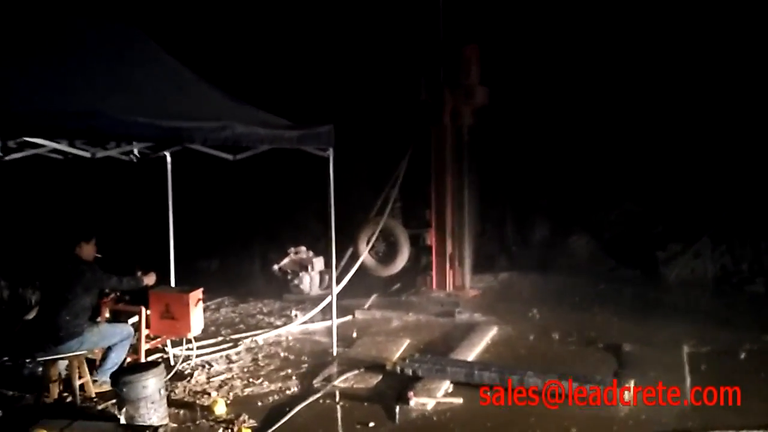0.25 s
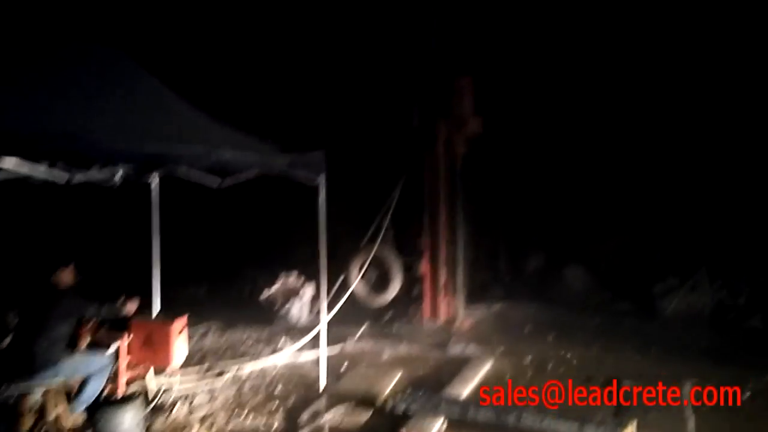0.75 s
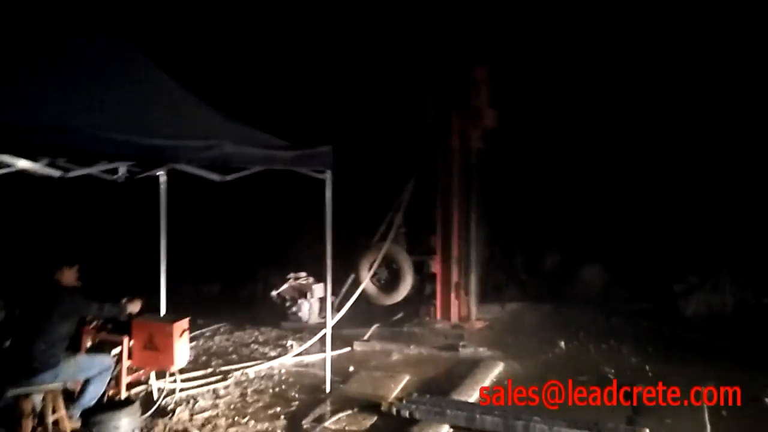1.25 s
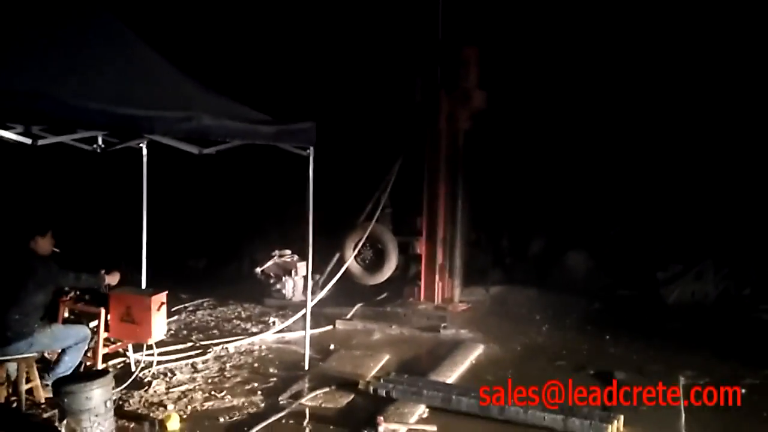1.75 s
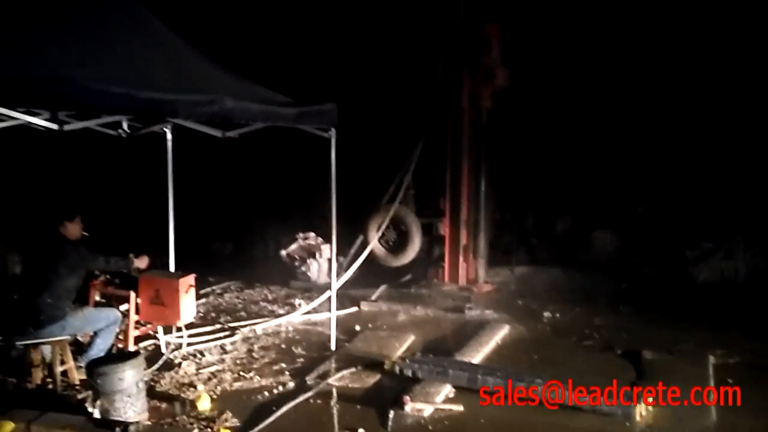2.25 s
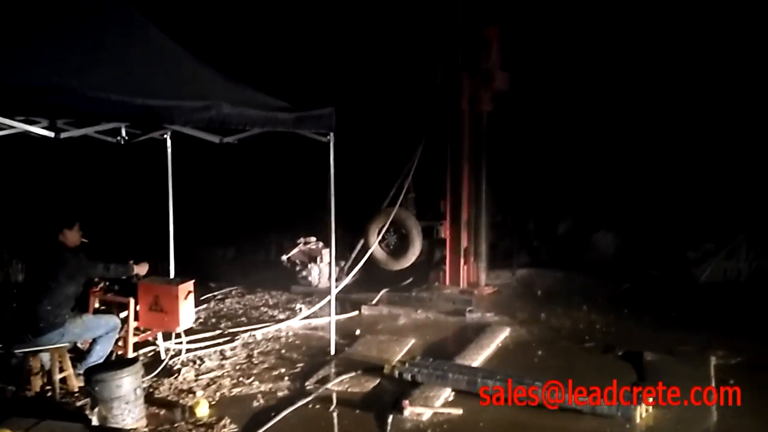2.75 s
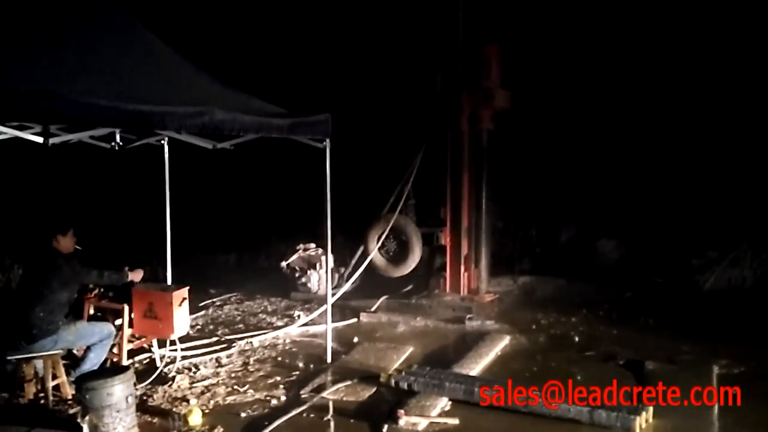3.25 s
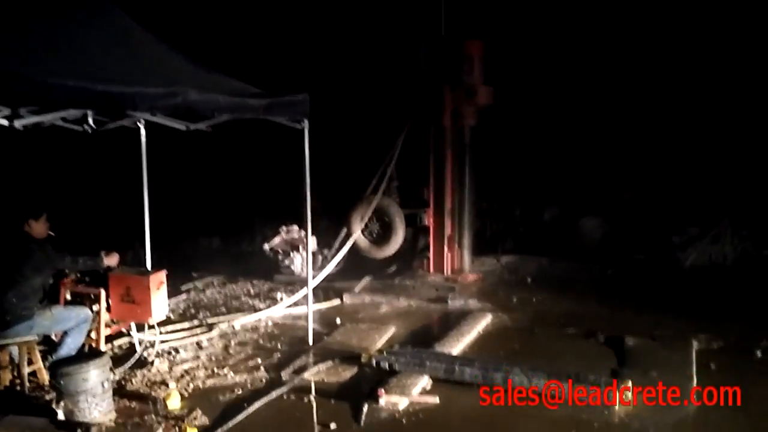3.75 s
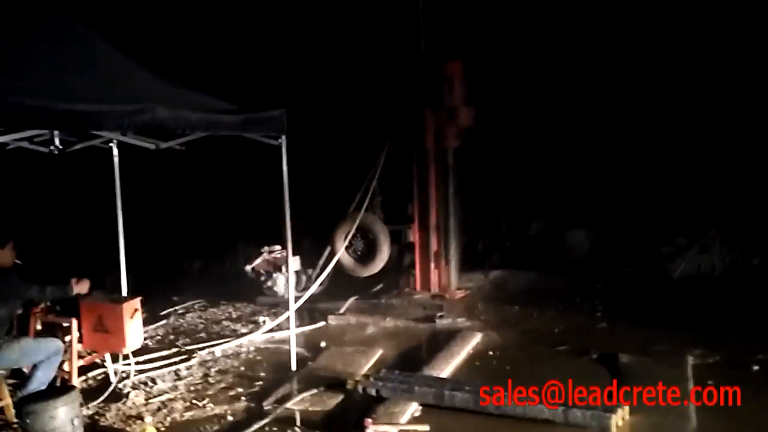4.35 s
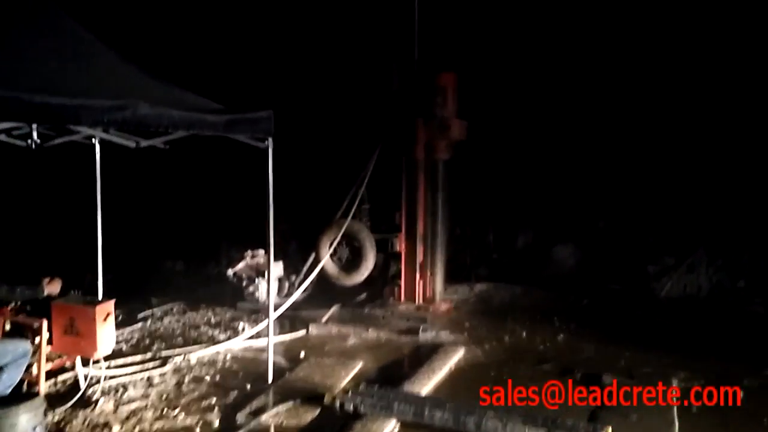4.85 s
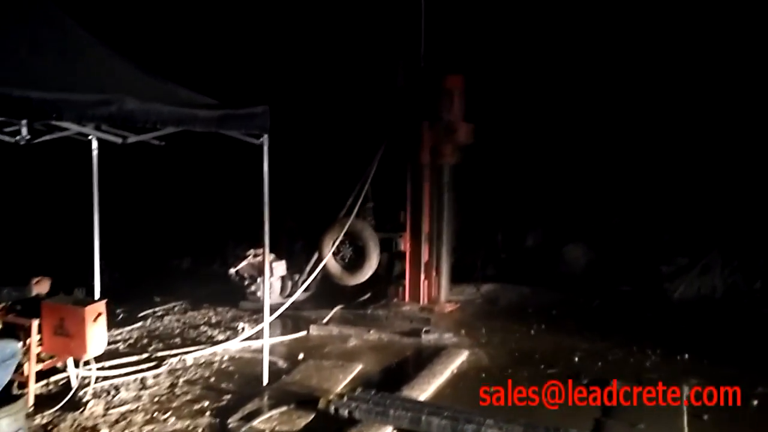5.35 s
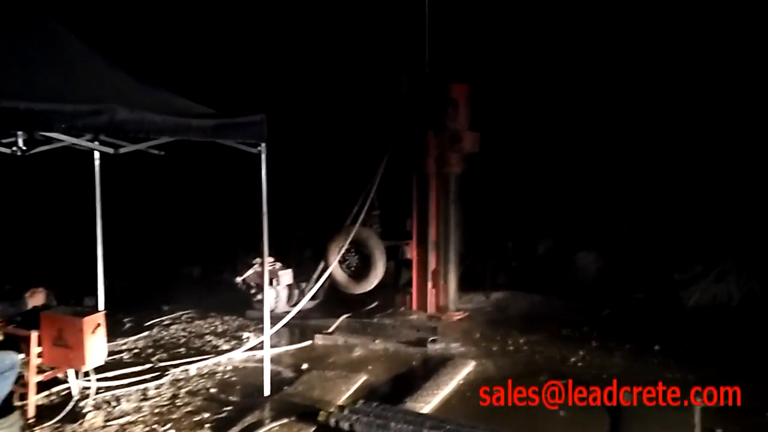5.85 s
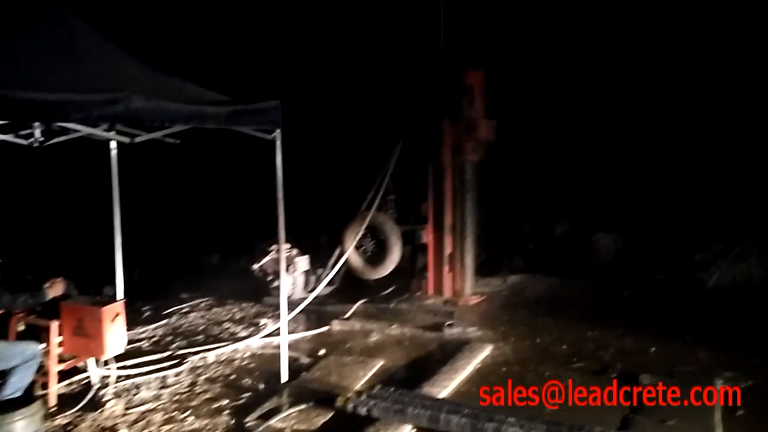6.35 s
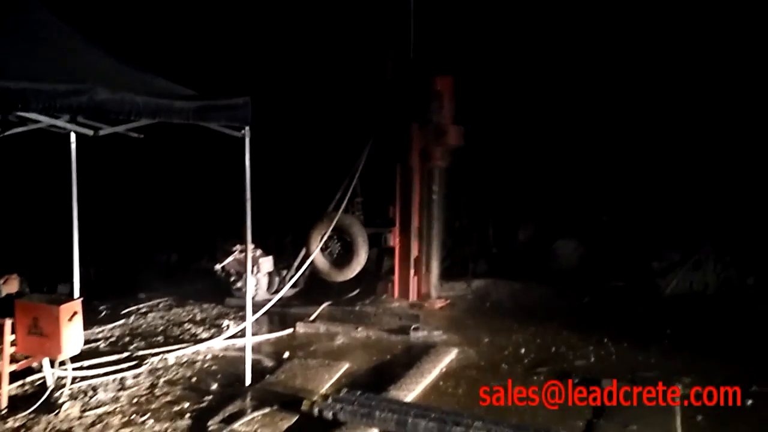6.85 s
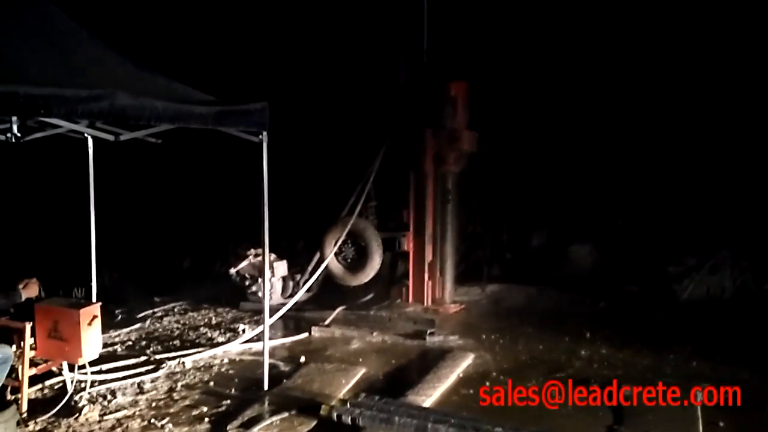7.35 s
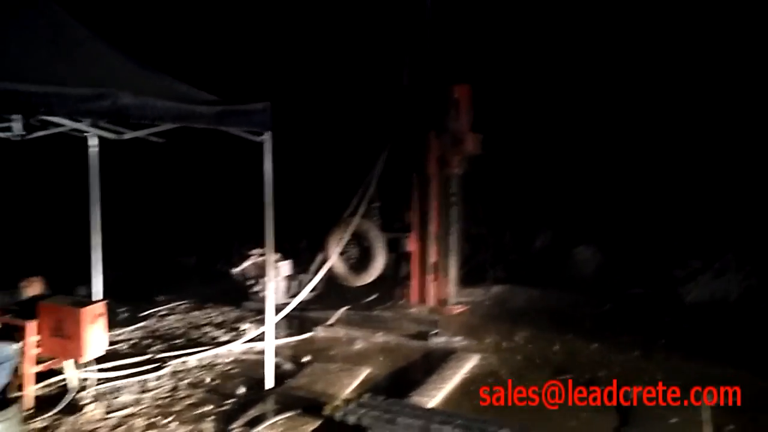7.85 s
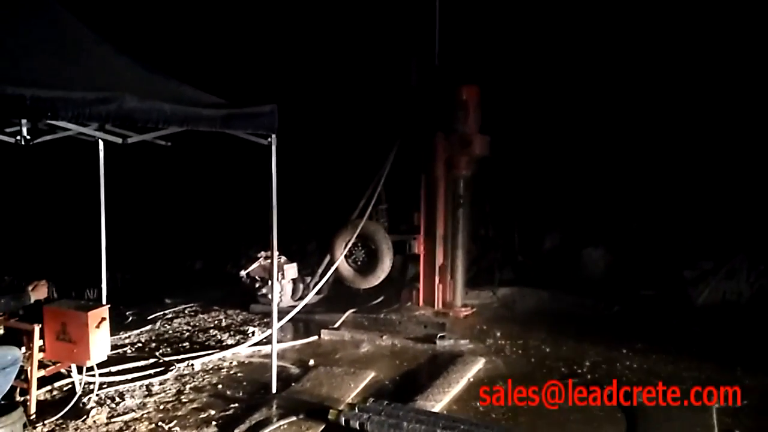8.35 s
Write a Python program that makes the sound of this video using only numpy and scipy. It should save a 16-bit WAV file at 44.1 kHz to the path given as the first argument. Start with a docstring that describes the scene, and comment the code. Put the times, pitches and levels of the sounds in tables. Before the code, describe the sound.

Outdoors at a drilling rig, a very loud jet of compressed air is already blowing at 0 s: a piercing, fluttering whistle around 4.5 kHz, wrapped in bright hiss and lower roar, overloading the microphone. Over the first three seconds it sinks towards 4.1 kHz and weakens, wavering between close tones, while loose steel knocks sound early on. It is softest near 3 s; machinery groans faintly around 3.5 to 4.2 s. The whistle swells again from 4 s, strongest near 5 s, with rougher spray above it. Around 5.6 s it slides upward and collapses into a broad gush, followed by a shorter, weaker one near 6.1 s. A thin, slowly growing hiss remains to 8.6 s, a weak whistle swelling near 7.2 s. The diesel's low drone and clatter run throughout, ducked under the air and clearer afterwards, with small metallic knocks.

```python
"""A well drilling rig at night, outdoors. Compressed air escapes with a piercing, fluttering whistle that sinks
in pitch; near 5.6 s the opening widens, the whistle lifts and bursts into two gushes, and a thin leak remains.
A diesel engine drones and clatters throughout; gain control pushes it down while the whistle is loud.
The air sounds are noise shaped by moving and fixed resonances; the engine is a stack of tones, rumble and
clatter; loose steel knocks are short bursts of ringing noise."""
import sys
import numpy as np
from scipy import signal
from scipy.fft import rfft, irfft
from scipy.io import wavfile
from scipy.ndimage import uniform_filter1d, minimum_filter1d, map_coordinates

SR = 44100
rng = np.random.default_rng(int(sys.argv[2]) if len(sys.argv) > 2 else 0)


def store_wav(level_fs):
    """Save 16-bit WAV to argv[1]."""
    pcm = np.round(np.clip(np.atleast_2d(level_fs), -1, 1) * 32767)
    wavfile.write(sys.argv[1], SR, pcm.T.astype(np.int16))


N = 379260
TIME, FREQ = np.arange(N) / SR, np.fft.rfftfreq(N, 1 / SR)  # seconds, Hz

# how hard the air blows; whistle, rush, roar and fizz all follow it: time_s, relative level_db
BLOW = [(0, 27), (.5, 22.5), (1.27, 20.5), (1.5, 12.5), (1.9, 11.5), (2.25, 2.5), (2.45, 3), (2.7, -1.5),
        (3.0, -9), (3.8, -4.5), (4.1, -1.5), (4.3, 5), (4.65, 7), (4.95, 12), (5.35, 7.5), (5.57, 4),
        (5.74, -14), (5.95, -31), (6.1, -37)]
# ringing of the air pipe, lifting or dipping narrow bands of the air sounds: pitch_hz, width_hz, lift_db
PIPE_RINGS = [(2200, 120, 3), (3960, 35, 5), (4130, 40, 4), (4243, 35, 5), (4415, 30, 5), (4501, 25, 4),
              (5000, 110, 3.5), (5120, 90, -6), (5260, 90, 2), (5836, 25, 4), (6351, 18, 7.5),
              (6461, 22, 6.5), (7080, 30, 3)]
# how fast the engine runs: time_s, firing_rate_hz
ENGINE_SPEED = [(0, 88.36), (3, 88.67), (5.3, 89.84), (6.1, 89.7), (7.3, 89.94), (8.6, 89.65)]
# spectrum of the engine's clatter: frequency_hz, relative level_db
CLATTER_SPECTRUM = [(150, -21), (330, -11.5), (430, -4.5), (510, 3.5), (630, 3.5), (740, -5.5), (840, -8),
                    (910, -7.5), (1060, -5), (1220, -13), (1500, -13.5), (2100, -10.5), (3000, -28),
                    (8000, -70)]


def amp(db):
    """Turns decibels into a gain."""
    return 10 ** (np.asarray(db) / 20)


def unit(x):
    """Scales a sound to an average strength (rms) of 1."""
    return x / np.sqrt(np.mean(x ** 2) + 1e-20)


def read(points, hz):
    """Reads a spectrum between its points, on a log-frequency axis."""
    point_hz, value = np.transpose(points)
    return np.interp(np.log(hz + 1), np.log(point_hz + 1), value)


def follow(rows):
    """Joins timed points into a curve with a value at every sample."""
    return np.interp(TIME, *np.transpose(rows))


def ramp(start_s, length_s):
    """Rises from 0 to 1 over a stretch of time."""
    return np.clip((TIME - start_s) / length_s, 0, 1)


def wander(rate_hz):
    """Random drift of rms 1 that moves no faster than about the given rate."""
    return unit(irfft(rfft(rng.standard_normal(N)) / (1 + (FREQ / rate_hz) ** 4), N))


def noise(colour, same):
    """Stereo noise of a given spectrum; same = 1 makes left and right alike, 0 unrelated."""
    a, b = rfft(rng.standard_normal((2, N)))
    same = np.clip(same, -1, 1)
    pair = np.array([a, same * a + np.sqrt(1 - same ** 2) * b])
    return unit(irfft(pair * amp(read(colour, FREQ)), N))


def band(size, hz, width_hz, same, order=1):
    """Narrow stereo noise round a pitch, which may glide; a higher order falls off more steeply."""
    a, b = rng.standard_normal((2, size)) + 1j * rng.standard_normal((2, size))
    same = np.clip(same, -1, 1)
    spectrum = np.fft.fft([a, same * a + np.sqrt(1 - same ** 2) * b])
    slow = np.fft.ifft(spectrum / (1 + (2 * np.fft.fftfreq(size, 1 / SR) / width_hz) ** 2) ** order)
    # turning the slow noise round the pitch moves it up to that frequency
    return unit((slow * np.exp(2j * np.pi * np.cumsum(hz * np.ones(size)) / SR)).real)


def resonate(x, hz, width_hz):
    """A resonance of gain 1 whose centre may follow a curve."""
    turn = np.exp(2j * np.pi * np.cumsum(hz * np.ones(N)) / SR)
    r = np.exp(-np.pi * width_hz / SR)
    return 2 * (turn * signal.lfilter([1 - r], [1, -r], x / turn)).real


def ringing(x, modes):
    """Lifts or dips the narrow bands of fixed resonances."""
    lift = 1 + sum((amp(db) - 1) / (1 + (2 * (FREQ - hz) / width) ** 2) for hz, width, db in modes)
    return unit(irfft(rfft(x) * lift, N))


def patchy(x, depth_db, frame_count, bin_count):
    """Lets patches of time and frequency swell and sink at random."""
    z = signal.stft(x, nperseg=512, noverlap=384)[2]
    field = uniform_filter1d(rng.standard_normal(z.shape[1:]), bin_count, 0)
    field = uniform_filter1d(field, frame_count, 1)
    return unit(signal.istft(z * amp(depth_db * unit(field)), nperseg=512, noverlap=384)[1][:, :N])


def power(x, size):
    """Average power of both channels, smoothed over a number of samples."""
    return abs(uniform_filter1d((x ** 2).mean(0), size)) + 1e-12


def add(mix, s, sound):
    """Mixes a stereo sound in at a given time."""
    part = mix[:, max(round(s * SR), 0):][:, :sound.shape[1]]
    part += sound[:, :part.shape[1]]


def from_right(x, lag_ms):
    """Sound from the right reaches the left side later; the delay may follow a curve."""
    left = map_coordinates(x[0], [np.arange(N) - lag_ms * SR / 1000], order=5, mode="nearest")
    return np.array([left, x[1]])


def yard(x, wet_db, t60):
    """Scattered echoes off the rig, the canopy and the ground, different on each side."""
    t = np.arange(SR // 4) / SR
    hits = rng.standard_normal((2, len(t))) * (rng.random((2, len(t))) < 1500 / SR)  # about 1500 a second
    taps = hits * amp(-60 * t / t60)  # 60 dB weaker after t60 seconds
    echoes = signal.fftconvolve(x, taps, axes=1)[:, :N]
    return unit(unit(x) + amp(wet_db) * unit(echoes))


def reflected(x, echo_db=-13, sway_ms=0.071, count=5):
    """Near reflections add to the sound and comb its spectrum; slowly drifting delays move the comb."""
    out = x
    for delay_ms in rng.uniform(4, 22, count):
        at = np.arange(N) - (delay_ms + sway_ms * wander(rate_hz=1.0)) * SR / 1000
        out = out + amp(echo_db) * np.array([np.interp(at, np.arange(N), side) for side in x])
    return unit(out)


def repeating(cycle, count=110, size=4096, slip=0.013):
    """Clatter that comes back alike in every engine cycle: a dense stack of low harmonics."""
    hz = np.arange(count) * np.mean(follow(ENGINE_SPEED)) / 6
    phases = np.exp(2j * np.pi * rng.random(count))
    shape = irfft(amp(read(CLATTER_SPECTRUM, hz)) * phases * (hz > 0), size)
    angle = cycle + slip * wander(rate_hz=3.4)  # radians, slipping a little
    return unit(np.interp(angle, np.arange(size) * 2 * np.pi / size, shape, period=2 * np.pi))


def engine(drone_db=-18.5, clatter_db=-0.32, throb=0.094, rough_db=1.43, chug=0.091, regular_db=-5,
           unsteady=0.81, fan_hz=113.5, fan_db=-11):
    """Firing tones and a fan's hum over a rumble; clatter throbs at each firing and chugs once a cycle."""
    # engine tones: multiple of the six-cylinder cycle rate, relative level_db
    orders = [(3, -29.5), (6, 0), (7, -19), (8, -32), (9, -18), (10, -26), (12, -12.5), (14, -26.5),
              (16, -30), (25, -25)]
    # clatter over time: time_s, relative level_db
    clatter_level = [(0, -7.5), (1.2, -19.5), (2.2, -19.5), (3.1, -27), (3.6, -32), (5.0, -23.5),
                     (5.85, -22), (6.15, -27), (7.5, -20.5), (8.6, -21.5)]
    # rumble beside the tones: time_s, relative level_db
    rumble_level = [(0, -6), (2, -2), (2.8, -29), (3.4, -16), (4.2, -8), (5, 1), (6, -7), (8.6, -5)]
    # spectrum of the rumble: frequency_hz, relative level_db
    rumble_spectrum = [(20, -26), (40, -24), (60, 0), (110, -3.5), (200, -5.5), (290, -12.5), (350, -7.5),
                       (460, -7), (600, -16), (1000, -24), (2000, -66)]
    # ringing panels of the machinery: pitch_hz, width_hz, lift_db
    panels = [(243, 3.1, 3.5), (265.6, 3, 7.5), (430, 7.2, 6), (457, 5.5, 9), (506, 7, 5.5), (726, 11, 9),
              (752, 45, 8), (920, 18, 11.5), (980, 18, 9), (1004, 8.5, 12.5), (1083, 17, 1)]
    # left-right likeness of the machinery: frequency_hz, likeness from 0 to 1
    likeness = [(60, 0), (130, 0.72), (290, 1), (640, 1), (1000, 0.93), (1500, 0), (4000, 0.9)]
    cycle = 2 * np.pi * np.cumsum(follow(ENGINE_SPEED)) / SR / 6  # radians; six firings a cycle
    tones = amp(fan_db) * np.sin(2 * np.pi * fan_hz * TIME + 0.094 * wander(rate_hz=5))
    for order, db in orders:
        sway = 1 + unsteady * (1 - 1.06 * amp(db)) * wander(rate_hz=11.0)  # weak tones waver most
        tones = tones + amp(db) * sway * np.sin(round(order) * cycle + 2 * np.pi * rng.random())
    same = read(likeness, FREQ)
    rumble = ringing(noise(rumble_spectrum, same), panels)
    low = np.sqrt(2) * tones * amp([[-.7], [.7]]) + amp(follow(rumble_level)) * rumble  # left, right dB
    knocks = patchy(noise(CLATTER_SPECTRUM, same), depth_db=2.7, frame_count=13, bin_count=3)
    knocks = knocks + amp(regular_db) * repeating(cycle)
    pulse = 1 + throb * np.cos(6 * cycle) + chug * np.cos(cycle)
    knocks = ringing(knocks * pulse * amp(rough_db * wander(rate_hz=66)), panels)
    clatter = from_right(knocks, lag_ms=0.12) * amp(follow(clatter_level) + clatter_db) * amp([[.3], [-.3]])
    return from_right(low, lag_ms=0.27) * amp(drone_db) + clatter


def rattles(width_hz=240, attack_s=0.0041, bite_db=-8, bite_hz=1150, bite_width_hz=900, bite_s=0.013):
    """Loose steel knocks: a short bright bite and a ring round one pitch that dies away."""
    # louder knocks of the rig: start_s, level_db, pitch_hz, decay_s
    hits = [(.372, -1.5, 566, 0.018), (.572, -3.5, 563, 0.016), (0.651, -7, 1070, 0.018),
            (0.944, -3.5, 984, 0.029), (1.245, -10, 1087, 0.025), (1.97, -15.5, 1038, 0.035),
            (2.168, -18, 1050, .02), (2.752, -19.5, 600, 0.036), (2.905, -21, 1023, 0.03),
            (3.095, -22, 556, 0.035), (3.705, -21, 706, 0.018), (4.846, -7.5, 578, 0.029),
            (5.115, -11.5, 599, 0.021), (5.858, -28, 1010, 0.028), (6.18, -27.5, 1040, .025),
            (6.249, -24.5, 1032, 0.022), (6.495, -28, 1060, 0.018), (6.578, -18.5, 525, 0.023),
            (6.716, -19, 516, 0.024), (6.789, -19, 549, 0.016), (6.915, -26, 491, 0.045),
            (7.104, -23.5, 1100, 0.023), (7.322, -21, 698, 0.021), (7.884, -20, 1096, 0.032),
            (7.922, -25, 1080, 0.044), (8.232, -27, 1143, 0.054), (8.308, -19.5, 698, 0.03),
            (8.352, -21.5, 593, 0.029), (8.38, -21, 976, 0.013)]
    out, t = np.zeros((2, N)), np.arange(SR // 4) / SR
    for s, db, hz, decay_s in hits:
        ring = band(len(t), hz, width_hz, same=0.98) * np.exp(-t / decay_s)
        ring = ring / np.sqrt(np.mean(ring[:, t < decay_s] ** 2))  # even strength for every knock
        bite = band(len(t), bite_hz, bite_width_hz, same=0.48) * np.exp(-t / bite_s)
        add(out, s, amp(db) * np.minimum(t / attack_s, 1) * (ring + amp(bite_db) * bite))
    return from_right(out, lag_ms=0.15)


def groan(width_hz=16, fade_s=0.11, start_s=3.48, length_s=0.67):
    """The machinery briefly sings on a few narrow bands of fixed pitch."""
    # tones of the groan: pitch_hz, level_db
    groan_tones = [(425, -35), (727, -36), (996, -52), (1330, -42)]
    tones = sum(amp(db) * band(N, hz, width_hz, same=0.99) for hz, db in groan_tones)
    return tones * ramp(start_s, fade_s) * (1 - ramp(start_s + length_s, fade_s))


def leak(level_db=-36.0, waver_db=0.5, whistle_hz=4275, whistle_width_hz=150, whistle_db=-46.0,
         swell_db=-46, swell_s=7.17, swell_length_s=0.24,
         start_s=5.59, rise_s=1, growth_db_per_s=1.5, rings_above_hz=5500):
    """A thin, wavering, slowly growing hiss stays behind, with a weak whistle that swells once."""
    # spectrum of the leak: frequency_hz, relative level_db
    leak_spectrum = [(900, -41), (1300, -21), (1900, -25), (2600, 3), (3300, 4), (4300, 4), (5300, -2),
                     (6800, -0.5), (8000, -2), (9400, -2.5), (10700, -11.5), (14800, -13.5), (15500, -49)]
    air = patchy(noise(leak_spectrum, same=0.46), depth_db=2.5, frame_count=20, bin_count=4)
    high_rings = [mode for mode in PIPE_RINGS if mode[0] > rings_above_hz]  # all that the leak excites
    air = ringing(yard(air, wet_db=-3, t60=0.05), high_rings)
    db = level_db + growth_db_per_s * (TIME - start_s) + waver_db * wander(rate_hz=5.1)
    singing = amp(whistle_db) + amp(swell_db) * np.exp(-((TIME - swell_s) / swell_length_s) ** 2)
    tone = singing * band(N, whistle_hz, whistle_width_hz, same=0.78)
    return (air * amp(db) + tone) * ramp(start_s, rise_s)


def gushes(ring_hz=2200, width_hz=90, ring_db=-35, ring_start_s=5.6, ring_length_s=0.71,
           rise_s=0.11, fall_db_per_s=103):
    """The last of the air leaves in gushes; the pipe's lowest resonance sings thinly through both."""
    # gushes through the widened opening: start_s, length_s, level_db
    bursts = [(5.536, 0.39, -15.5), (6.088, 0.2, -25.5)]
    # spectrum of a gush: frequency_hz, relative level_db
    gush_spectrum = [(300, -38), (1400, -3), (2000, -6), (2220, -2), (2500, -2.5), (3500, 1), (4400, -7.5),
                     (5000, 4), (5700, -2), (6450, 6), (7300, -0.5), (10000, -7), (12000, -11.5),
                     (15500, -13)]

    def envelope(start_s, length_s):
        """Rises evenly, holds, then falls at a steady rate in decibels."""
        return ramp(start_s, rise_s) * amp(-fall_db_per_s * np.maximum(TIME - start_s - length_s, 0))

    gush = patchy(noise(gush_spectrum, same=0.3), depth_db=1.5, frame_count=12, bin_count=5)
    gush = ringing(yard(gush, wet_db=3.0, t60=0.11), PIPE_RINGS)
    ring = band(N, ring_hz, width_hz, same=0.082) * amp(ring_db) * envelope(ring_start_s, ring_length_s)
    return ring + gush * sum(amp(db) * envelope(start_s, length_s) for start_s, length_s, db in bursts)


def hiss(rush_db=-23, roar_db=-24.5, steady_roar_db=-26, fizz_db=-38, rush_slope=0.86, roar_slope=1,
         fizz_slope=1.39, end_s=5.65, fade_s=0.11):
    """Broad air noise round the whistle: a bright rush, a lower roar, and fizz when the blow is hard."""
    # level of the jet's broad noise: time_s, relative level_db
    hissiness = [(0, 2), (.5, 1), (1.1, -2), (1.6, 0), (2.1, -1.5), (2.55, -0.5), (3.3, 4.5), (3.9, 4.5),
                 (4.3, 1.5), (5.4, 4)]
    # spectrum of the rush: frequency_hz, relative level_db
    rush_spectrum = [(300, -10), (2500, 8), (4000, -32), (5200, 14), (6000, 13), (7500, 12), (8600, 11.5),
                     (9800, 6.5), (11000, 1.5), (13500, 1), (15500, -24)]
    # spectrum of the roar: frequency_hz, relative level_db
    roar_spectrum = [(30, 1), (120, 3.5), (280, 0), (400, -8.5), (620, -2), (820, -2), (1040, 0.5),
                     (1350, -3), (2100, 1), (2600, 2.5), (3200, 0.5), (4200, -14), (6000, -49)]
    blow_db = follow(BLOW)
    rush = patchy(noise(rush_spectrum, same=0.073), depth_db=2.3, frame_count=14, bin_count=9)
    rush = ringing(rush, PIPE_RINGS)
    roar = reflected(patchy(noise(roar_spectrum, same=0.17), depth_db=2.5, frame_count=20, bin_count=4))
    fizz = noise([(6000, -13), (10500, 5.0), (15500, -1.0)], same=0.2)  # frequency_hz, relative level_db
    # each slope is the dB gained for each dB of blow
    air = (rush * amp(rush_db + rush_slope * blow_db)
           + roar * np.hypot(amp(steady_roar_db), amp(roar_db + roar_slope * blow_db))
           + fizz * amp(fizz_db + fizz_slope * blow_db))
    return air * amp(follow(hissiness)) * (1 - ramp(end_s, fade_s))


def thin_whistle(low_hz=6351, high_hz=6461, width_hz=22, high_db=-2):
    """A pair of the pipe's high rings sings faintly beside the main whistle."""
    # level of the pair: time_s, level_db
    thin_level = [(0, -30), (1.6, -29), (2.8, -38), (3.6, -42), (5.5, -42), (5.9, -39), (6.4, -50),
                  (8.6, -52)]
    pair = band(N, low_hz, width_hz, same=0.32) + amp(high_db) * band(N, high_hz, width_hz, same=0.34)
    return pair * amp(follow(thin_level))


def strands(width_hz=52, waver_hz=17, jitter_hz=12, fade_s=0.082):
    """The gap locks onto one wavering tone after another, at times two at once."""
    # locked tones: start_s, length_s, first_pitch_hz, last_pitch_hz, level_db against the wide band
    locked_tones = [(0, 0.5, 4604, 4520, -0.5), (0, 0.49, 4390, 4420, -8), (0.429, 0.95, 4444, 4303, 2),
                    (0.998, .3, 4320, 4270, -6), (1.33, 0.14, 4167, 4170, 2), (1.4, .75, 4273, 4245, -5),
                    (1.78, 1.07, 4206, 4140, -7), (2.283, 0.31, 4280, 4266, -0.5),
                    (3.298, 0.96, 4230, 4244, -10), (4.2, 1.17, 4162, 4120, 1.5),
                    (4.297, 0.57, 4000, 3996, -3), (4.883, 0.65, 3990, 3990, 1),
                    (5.433, 0.26, 4216, 4300, -2.5), (5.582, .2, 4340, 4490, -3)]
    out = np.zeros((2, N))
    waver = waver_hz * wander(rate_hz=9.15) + jitter_hz * wander(rate_hz=70.2)
    for start_s, length_s, from_hz, to_hz, db in locked_tones:
        t = np.arange(0, length_s, 1 / SR)
        own_waver = np.roll(waver, rng.integers(N))[:len(t)]
        hz = np.linspace(from_hz, to_hz, len(t)) + own_waver
        envelope = np.clip(np.minimum(t, length_s - t) / fade_s, 0, 1)
        add(out, start_s, amp(db) * envelope * band(len(t), hz, width_hz, same=0.47))
    return out


def whistle_pitch(start_hz=4520, settled_hz=4069, settle_s=1.55, settle_shape=1.49,
                  widen_s=5.52, widen_length_s=0.36, widen_rise_hz=640):
    """The pitch settles as the line drains, then slides up as the opening widens."""
    pitch = settled_hz + (start_hz - settled_hz) * np.exp(-(TIME / settle_s) ** settle_shape)
    return pitch + widen_rise_hz * ramp(widen_s, widen_length_s)


def whistle(band_hz=500, spray_hz=1100, spray_ratio=1.12, flutter_db=0.93, level_db=1, lower_ratio=0.94,
            lower_width_hz=260, lower_db=-6, lower_s=1.32, lower_rise_s=0.16, end_s=6.3, fade_s=0.1):
    """Turbulence drives the gap: strands in a fluttering band, spray above, later a lower lobe as well."""
    # spray above the whistle's pitch: time_s, level_db against the wide band
    spray_level = [(0, -22.5), (3.4, -24), (4.05, -12), (4.6, -7.5), (4.95, -13), (5.55, -16), (5.72, -3)]
    # the whistle's octave: time_s, relative level_db
    octave_level = [(0, -26), (.5, -28), (.9, -52), (4.2, -45), (5.0, -30), (5.4, -24), (5.6, -30)]
    pitch = whistle_pitch()
    same = .68
    # spectrum of the driving noise: frequency_hz, relative level_db
    jet = [(2500, -45), (3550, -5), (3800, -2), (5000, 1.5), (5800, -1), (7000, -19), (8500, -48)]
    wide, spray = noise(jet, same), noise(jet, same / 2)
    for _ in range(3):  # each pass narrows the bands further
        wide = resonate(wide, pitch, band_hz)
        spray = resonate(spray, pitch * spray_ratio, spray_hz)
    lower = band(N, pitch * lower_ratio, lower_width_hz, same, order=2)
    lower = lower * amp(lower_db) * ramp(lower_s, lower_rise_s)  # enters once the pressure eases
    air = unit(wide) + lower + amp(follow(spray_level)) * unit(spray)
    air = patchy(air, depth_db=2.5, frame_count=16, bin_count=3)
    air = ringing(reflected(air), PIPE_RINGS)
    tone = air / np.sqrt(power(air, size=6000)) + strands()
    tone = tone / np.sqrt(power(tone, size=1100))  # slow swells even out, the fast flutter stays
    # squaring the tone doubles its pitch
    octave = unit(resonate(resonate(tone ** 2, 2 * pitch, 1200), 2 * pitch, 1200))
    level = amp(follow(BLOW) + level_db + flutter_db * wander(rate_hz=94)) * (1 - ramp(end_s, fade_s))
    return (tone + amp(follow(octave_level)) * octave) * level


def scene():
    """Air from the borehole on the right, with the machinery behind it."""
    # the air's bearing shifts slowly: time_s, delay of the left side_ms
    bearing = [(0, .134), (2.5, .148), (4.3, .183), (5.2, .19), (8.6, .18)]
    air = whistle() * amp([[-.4], [.4]]) + hiss() + gushes() + leak() + thin_whistle()  # left, right dB
    return from_right(air, follow(bearing)) + engine() + rattles() + groan()


def overload(x, ceiling_db=7.5, headroom_db=-0.5, share=0.46):
    """The input backs off too little for loud sound: crests bend and grow a shrill third harmonic."""
    ceiling = np.maximum(amp(ceiling_db), amp(headroom_db) * np.sqrt(power(x, size=2000)))
    fine = signal.resample_poly(x / ceiling, 3, 1, axis=1)  # a finer time grid limits false tones
    bent = fine + share * (np.clip(fine, -1, 1) - fine)
    return ceiling * signal.resample_poly(bent, 1, 3, axis=1)


def record(dry, knee_db=-8.0, strength=0.81, peak_db=-0.1, size=50, edge_hz=15700):
    """An overloading input, gain control above a soft knee, a fast limiter, then a treble cut-off."""
    driven = overload(dry)
    loudness = power(driven, size=4000) / amp(knee_db) ** 2
    ducked = driven * amp(-strength * 10 * np.log10(1 + loudness))
    allowed = np.minimum(1, amp(peak_db) / (abs(ducked).max(0) + 1e-9))
    limiter = uniform_filter1d(minimum_filter1d(allowed, size), size)
    held = np.clip(ducked * limiter, -1, 1)
    return signal.oaconvolve(held, signal.firwin(511, edge_hz, window=("kaiser", 9), fs=SR)[None], "same")


dry = scene()
out = record(dry)
store_wav(out)
```